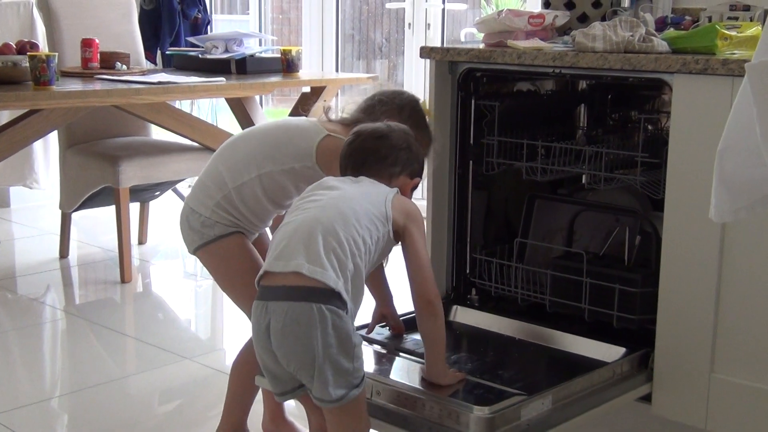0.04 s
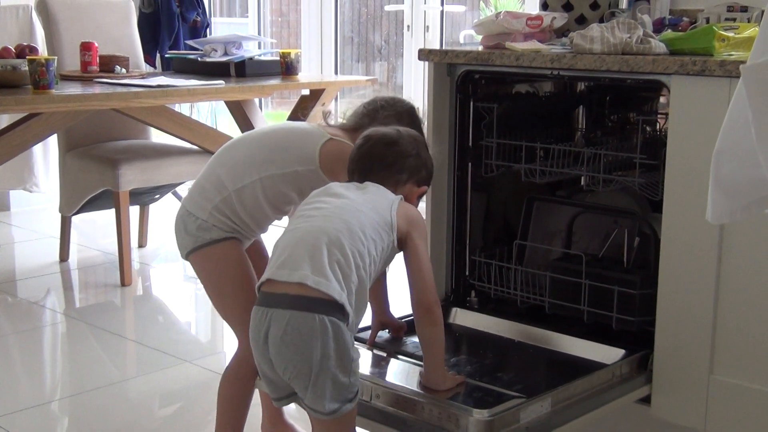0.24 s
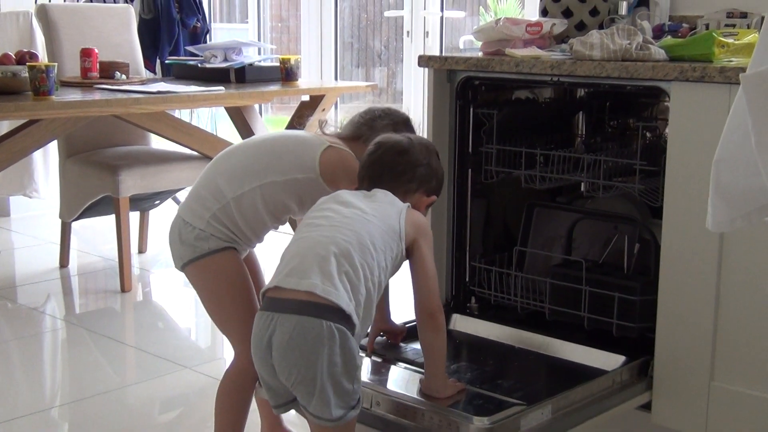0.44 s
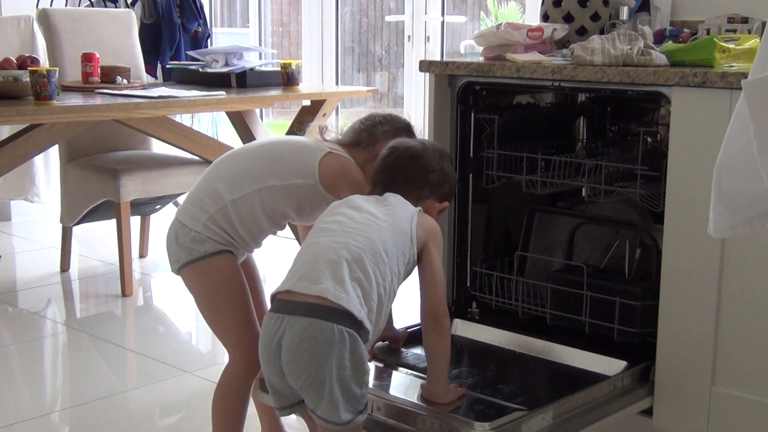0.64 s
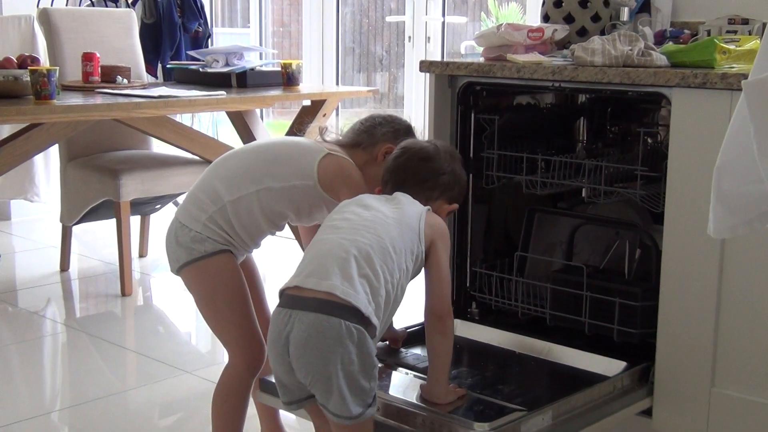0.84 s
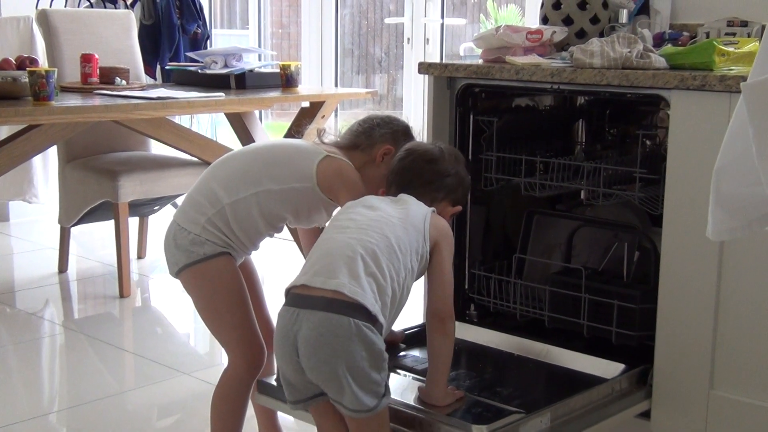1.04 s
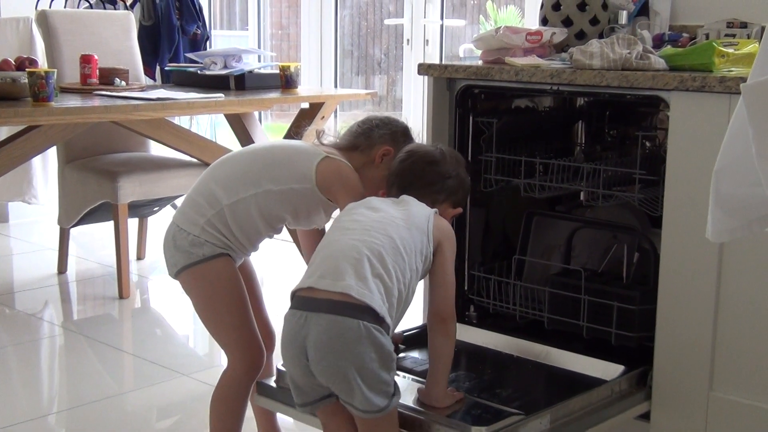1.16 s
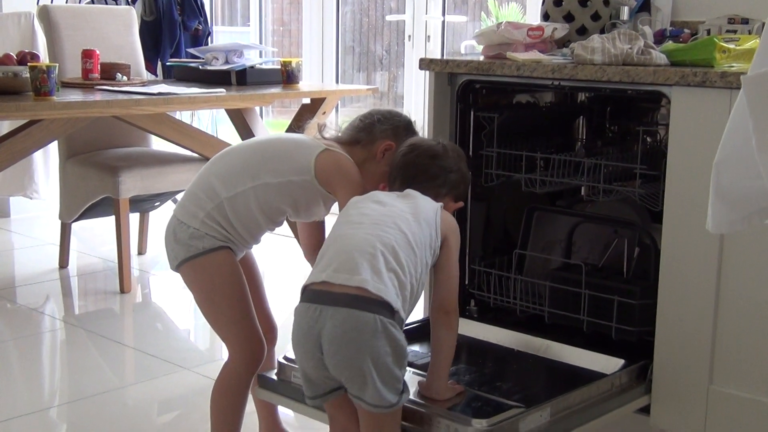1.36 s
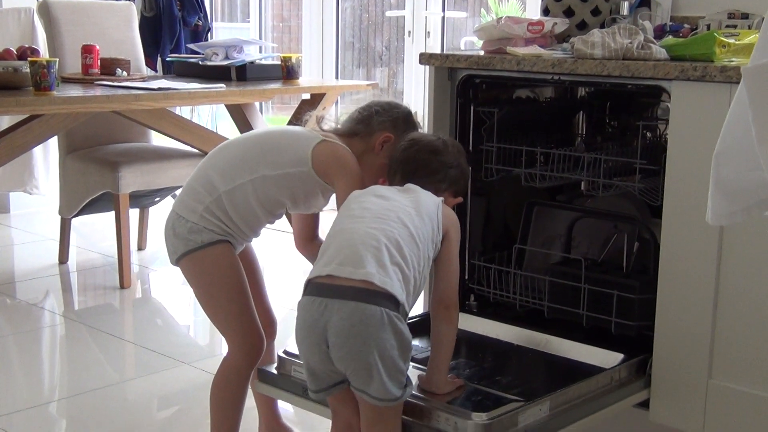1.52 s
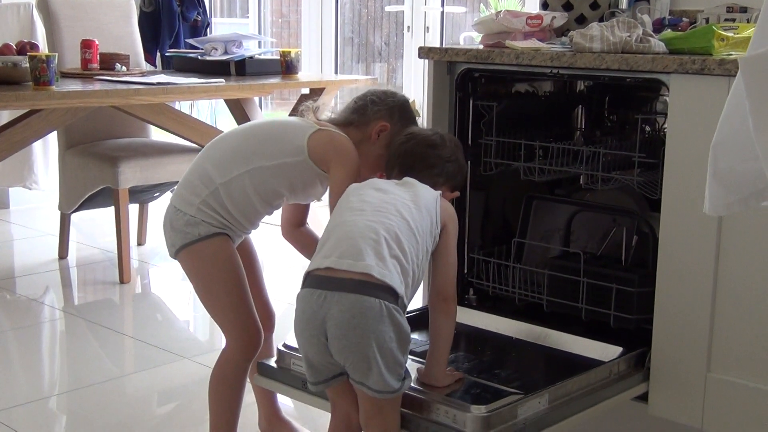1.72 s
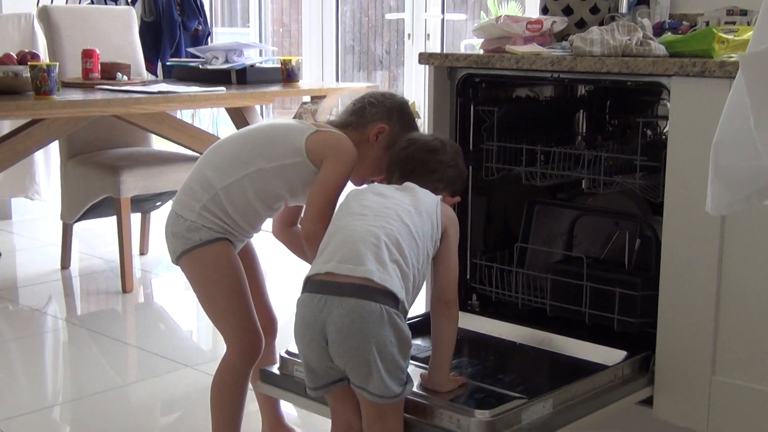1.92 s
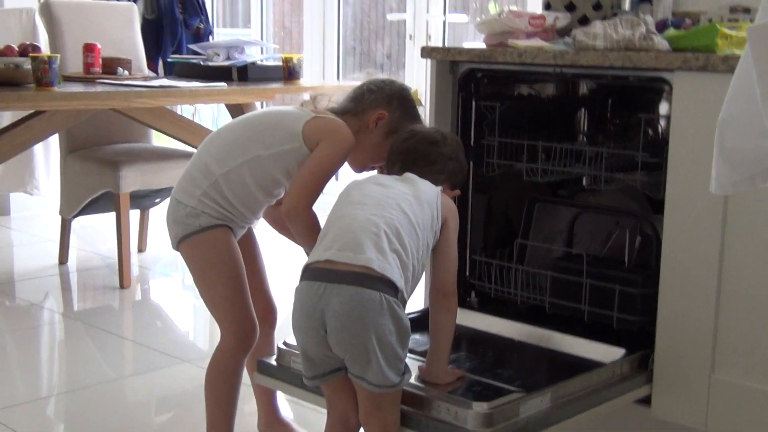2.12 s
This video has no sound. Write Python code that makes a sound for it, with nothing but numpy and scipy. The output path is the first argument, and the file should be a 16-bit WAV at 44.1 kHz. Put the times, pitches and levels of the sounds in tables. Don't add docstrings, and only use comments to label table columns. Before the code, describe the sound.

Hands knock an open dishwasher door in a tiled kitchen: soft pats, a small latch click, thumps with wire rattle, a bright snap, then a loud ringing clack, heard from a few metres away over faint hum.

```python
import sys
import numpy as np
from scipy import signal
from scipy.fft import rfft, irfft, next_fast_len
from scipy.io import wavfile
from scipy.ndimage import uniform_filter1d

SR = 44100
rng = np.random.default_rng(int(sys.argv[2]) if len(sys.argv) > 2 else 0)


def ratio(d):
    e = np.asarray(d, float) / 20
    return 10 ** e


def persist_wave(psi):
    counts = np.round(np.clip(psi, -1, 1) * 32767).astype(np.int16)
    wavfile.write(sys.argv[1], SR, np.atleast_2d(counts).T)


N = 96314
BURST_N = 16384
BANDS_HZ = 30 * 2 ** np.arange(0, 9.4, .5)


def unit(x):
    return x / np.sqrt(np.sum(x ** 2))


def stereo(mid, side):
    return np.array([mid + side, mid - side])


def read(table, hz):
    a = np.array(table, float)
    return np.interp(np.log(np.maximum(hz, 1)), np.log(a[:, 0]), a[:, 1])


def colour(x, table, edge_db=-40):
    hz = np.arange(2049) * SR / 4096
    db = read([(table[0][0] / 2, table[0][1] + edge_db)] + list(table), hz)
    cepstrum = irfft(db * np.log(10) / 20)
    cepstrum[1:2048] *= 2
    cepstrum[2049:] = 0
    impulse = irfft(np.exp(rfft(cepstrum)))
    return signal.fftconvolve(np.atleast_2d(x), impulse[None], axes=1)[:, :np.shape(x)[-1]]


def carve(x, holes):
    hz = np.fft.rfftfreq(x.shape[-1], 1 / SR)
    gain_db = np.zeros_like(hz)
    for f_hz, width_hz, db in holes:
        gain_db += db * np.exp(-((hz - f_hz) / width_hz) ** 2)
    return irfft(rfft(x) * ratio(gain_db), x.shape[-1])


def band(x, hz):
    f = np.maximum(np.fft.rfftfreq(x.shape[-1], 1 / SR), 1)
    octaves = np.log2(f / hz)
    return irfft(rfft(x) * np.cos(np.pi / 2 * np.clip(2 * octaves, -1, 1)) ** 2, x.shape[-1])


def walk(rate_hz):
    k = int(SR / rate_hz)
    steps = np.repeat(rng.standard_normal(N // k + 1), k)
    w = uniform_filter1d(uniform_filter1d(steps, k), k)[:N]
    return w / np.std(w)


def ring(modes, t):
    return sum(ratio(db) * np.sin(2 * np.pi * hz * t) * ratio(-60 * t / t60) for hz, db, t60 in modes)


def struck(modes, s, db, t, rise_s):
    after = np.maximum(t - s, 0)
    modes_sum = sum((-1) ** k * ring([m], after) for k, m in enumerate(modes))
    return ratio(db) * modes_sum * (1 - np.exp(-after / max(rise_s, 1e-4)))


# f/Hz, t60/s
ROOM_T60_S = [(100, 0.73), (250, 0.5), (700, 0.52), (2500, 0.49), (6000, 0.43), (10000, 0.28),
              (16000, 0.26)]
# f/Hz, level/dB
ROOM_SIDE_DB = [(60, -17), (110, -52), (200, -28), (380, -16), (700, -25.5), (1290, -22), (2380, -20.5),
                (4400, -17), (8120, -6.5), (15000, -51)]
BUILD_S, BASS_LATE_CYCLES = 0.00057, 0.84


def room(tail):
    t = np.arange(BURST_N) / SR
    noise, out = rng.standard_normal((2, BURST_N)), 0
    for hz in BANDS_HZ:
        decay = ratio(-60 * t / read(ROOM_T60_S, hz) / tail)
        env = decay * (1 - np.exp(-t / (BUILD_S + BASS_LATE_CYCLES / hz)))
        mid, side = (unit(v) * np.sqrt(hz) for v in band(noise, hz) * env)
        out = out + stereo(mid, side * ratio(read(ROOM_SIDE_DB, hz)))
    return unit(out)


CLICK_SCATTER_DB = 5.5


def knocks(events, tone, modes=None, modes_db=-6, wet=True, strike_db=-3, holes=(), tail=1):
    lead = SR // 4
    x, blows = np.zeros((2, 2, N + lead + BURST_N))
    t = np.arange(BURST_N) / SR
    for s, db, rise_s, length_s, rattle_db in events:
        clicks = rng.standard_normal(BURST_N) * ratio(CLICK_SCATTER_DB * rng.standard_normal(BURST_N))
        swell = 1 - np.exp(-t / max(rise_s, 1e-4))
        rattle = unit(clicks * swell * np.exp(-t / max(length_s, 1e-4)))
        echo = room(tail) if wet else 0
        i = int(s * SR) + lead
        x[:, i:i + BURST_N] += ratio(db) * 30 * (ratio(rattle_db) * rattle / 2 + echo)
        blows[:, i + int(2 * rise_s * SR)] = ratio(db + strike_db) * 20
    body = unit(colour(x, tone))
    if modes:
        rung = signal.fftconvolve(x + blows, ring(modes, t)[None], axes=1)[:, :x.shape[1]]
        body = body + ratio(modes_db) * unit(rung)
    return np.sqrt(np.sum(x ** 2)) * carve(body, holes)[:, lead:lead + N]


# f/Hz, level/dB
HOUSE_TONE = [(15, -45), (25, -17.5), (124, -12), (245, -6.5), (312, -8), (438, -6.5), (668, -10),
              (2560, -22.5), (3000, -37), (3900, -59), (6600, -120)]
HOUSE_SIDE_DB = [(60, -4), (110, -18), (200, -15), (380, -22), (700, -19.5), (1290, -19.5), (2380, -16),
                 (4400, -18), (8120, -6), (15000, -23)]
HOUSE_DB, HOUSE_FADE_DB_PER_S, FLICKER_DB = -62, -0.5, .8
# f/Hz, level/dB
HISS_TONE = [(1760, -36), (3000, -1), (6490, -1), (9400, -12), (14800, 5), (15200, -9.5), (16000, -2),
             (18400, -22), (19000, -33)]
# f/Hz, width/Hz, depth/dB
HISS_HOLES = [(9500, 590, -4.5)]
HISS_DB, HISS_FADE_DB_PER_S = -23.5, -6.5


def house(t):
    noise, out = rng.standard_normal((2, next_fast_len(N))), 0
    fade_s = np.minimum(t, 1.1)
    for hz in BANDS_HZ:
        if hz < 3000:
            db = read(HOUSE_TONE, hz) + HOUSE_FADE_DB_PER_S * fade_s
        else:
            db = HISS_DB + read(HISS_TONE, hz) + HISS_FADE_DB_PER_S * fade_s
        mid, side = band(noise, hz)[:, :N] * ratio(db + FLICKER_DB * walk(8.34))
        out = out + stereo(mid, side * ratio(read(HOUSE_SIDE_DB, hz)))
    return carve(out, HISS_HOLES) * ratio(HOUSE_DB) / np.std(out)


# f/Hz, level/dB rms
MOTOR_TONES = [(99, -78), (247, -80), (452, -78), (2519, -84.5)]


def motor(t):
    return sum(np.sqrt(2) * ratio(db + 2 * walk(6.43)) * np.sin(2 * np.pi * hz * t) for hz, db in MOTOR_TONES)


WHISTLE_HZ, WHISTLE_DB = 15625, -78
FIELD_HZ, GAP_S, GAP_SHARE = 50, .090, .2


def screen_whistle(t):
    gate = np.abs(((t - GAP_S) * FIELD_HZ + .5) % 1 - .5) > GAP_SHARE / 2
    tone = np.sqrt(2) * ratio(WHISTLE_DB) * np.sin(2 * np.pi * WHISTLE_HZ * t)
    return uniform_filter1d(gate * 1., size=44) * tone


# f/Hz, level/dB, t60/s
CAMERA_MODES = [(2120, -2, 0.0035), (1480, -10, 0.011), (3000, -7.5, 0.0042), (4170, -11, .003),
                (6750, -15, 0.0073), (8800, -9.5, 0.0033), (11900, 6.5, 0.0012), (15800, -6, 0.0025),
                (16800, -14, .004)]
CAMERA_S, CAMERA_DB, CAMERA_RISE_S = 1.8292, -29, 0.000081


def camera_tick(t):
    after = np.maximum(t - CAMERA_S, 0)
    return ratio(CAMERA_DB) * ring(CAMERA_MODES, after) * (1 - np.exp(-after / CAMERA_RISE_S))


# t/s, level/dB
PATS = [
    (.051, -49),
    (0.077, -56),
]
# f/Hz, level/dB, t60/s
PAT_MODES = [(237, 0.5, 0.077), (179, -20, .05)]


def pats(t):
    return sum(ratio(db) * ring(PAT_MODES, np.maximum(t - s, 0)) for s, db in PATS)


# t/s, level/dB, rise/s, rattle length/s, rattle over room/dB
TICKS = [(.053, -61, 0.0014, 0.0039, 0), (.058, -59, 0.0011, 0.0043, 0.055),
         (.159, -66, 0.00085, .001, 0.0083), (.172, -65.5, 0.00043, 0.0023, 0.013),
         (.89, -75, 0.0018, 0.0026, 0), (1.35, -68.5, 0.0023, 0.012, 0), (2.07, -54, .001, 0.0023, 0)]
# f/Hz, level/dB
TICK_TONE = [(3000, -22), (6000, 8), (8000, 12), (13000, 7), (16000, 0), (18500, -12)]


def ticks():
    return knocks(TICKS, TICK_TONE, wet=False)


# t/s, level/dB, rise/s, rattle length/s, rattle over room/dB
SLIDE = [
    (1.834, -62.5, .03, 0.11, 0),
    (1.928, -60.5, .002, 0.0076, 0),
]
# f/Hz, level/dB
SLIDE_TONE = [(3000, -6), (6000, -7), (8500, 0), (12000, -2), (14000, -8), (17000, -22)]


def slide():
    return knocks(SLIDE, SLIDE_TONE, wet=False)


# t/s, level/dB, rise/s, rattle length/s, rattle over room/dB
SCRAPE = [
    (1.939, -51, 0.0024, 0.018, 0.017),
]
# f/Hz, level/dB
SCRAPE_TONE = [(500, 20), (1200, 15), (4500, 16), (5500, -2), (8000, -4), (17000, -25)]


def scrape():
    return knocks(SCRAPE, SCRAPE_TONE, wet=False)


# t/s, level/dB, rise/s, rattle length/s, rattle over room/dB
EARLIER = [
    (-0.013, -50, 0.0011, 0.004, -3),
]
# f/Hz, level/dB
EARLIER_TONE = [(180, -39), (300, -34), (610, 1), (930, -11), (1160, -1.5), (3300, -6.5), (4480, -5),
                (17000, -22)]
# f/Hz, width/Hz, gain/dB
EARLIER_BUMPS = [(4440, 130, 8.7), (2570, 100, 5.4)]


def earlier_knock():
    return knocks(EARLIER, EARLIER_TONE, holes=EARLIER_BUMPS)


# t/s, level/dB, rise/s, rattle length/s, rattle over room/dB
CATCH = [
    (.210, -50.5, 0.00041, 0.0033, 3.8),
]
# f/Hz, level/dB
CATCH_TONE = [(1900, -19), (2400, -2), (3000, 3.5), (3350, 7.5), (3800, 6), (4400, -17.5), (8000, -12.5),
              (11000, -25)]
# f/Hz, width/Hz, depth/dB
CATCH_HOLES = [(3300, 87, -7)]


def latch_catch():
    return knocks(CATCH, CATCH_TONE, tail=.8, holes=CATCH_HOLES)


# t/s, level/dB, rise/s, rattle length/s, rattle over room/dB
RACK = [
    (1.116, -59.5, 0.0035, 0.0075, 4.5),
    (1.149, -39.5, 0.0092, 0.0079, 3.3),
]
# f/Hz, level/dB
RACK_TONE = [(800, 8.5), (2000, 3), (4500, -2), (6600, -0.5), (10500, 2.5), (13000, -2), (14500, -5),
             (18500, -14)]
# f/Hz, level/dB, t60/s
RACK_MODES = [(6650, -3, .015), (8600, -2, .02), (10600, 0, .012), (14300, -5, .02)]


def rack():
    return knocks(RACK, RACK_TONE, RACK_MODES, modes_db=-22)


# t/s, level/dB, rise/s, rattle length/s, rattle over room/dB
NUDGE = [
    (1.720, -47, 0.000614, 0.007, 2),
    (1.729, -49, 0.0032, 0.0098, -5),
]
# f/Hz, level/dB
NUDGE_TONE = [(100, -14.5), (250, 3.5), (600, -12), (1290, -7.5), (1740, -5), (2100, -13), (8370, -21.5),
              (12500, -28), (15000, -44)]
# f/Hz, level/dB, t60/s
NUDGE_MODES = [(265, -2, .07), (370, -2, .08), (580, -1, .07), (1050, -4, .05), (1780, 0, .07),
               (3400, 6, .012)]


def nudge():
    return knocks(NUDGE, NUDGE_TONE, NUDGE_MODES, modes_db=-6, strike_db=4)


# t/s, level/dB, rise/s, rattle length/s, rattle over room/dB
THUMPS = [
    (1.117, -40.5, 0.007, 0.0068, -1.3),
    (1.138, -40, 0.003, 0.0029, -1.4),
    (1.536, -72, 0.0019, 0.0059, 0),
]
# f/Hz, level/dB
THUMP_TONE = [(80, -21.5), (209, 2.5), (950, -5), (1100, -6), (2400, -16.5), (3500, -25.5), (8000, -51)]
# f/Hz, level/dB, t60/s
DOOR_MODES = [(252, -1, .09), (395, -3, .09), (580, 0, .09), (750, -6, .07), (1100, -5, .05),
              (1390, -6, .05)]
DOOR_RING = [(182, 2, .15), (251, 3, 0.23), (574, 2, .15), (762, 1, .2), (1100, -17, 0.11), (1376, -6, .12)]


def door_thumps(t):
    hits = knocks(THUMPS, THUMP_TONE, DOOR_MODES, modes_db=-1.5, strike_db=8)
    return hits + struck(DOOR_RING, THUMPS[0][0], -48, t, rise_s=0.0063)


# t/s, level/dB, rise/s, rattle length/s, rattle over room/dB
LID = [
    (1.429, -39, 0.0012, 0.013, 0),
    (1.432, -33.5, 0.00094, 0.0062, 0.022),
]
# f/Hz, level/dB
LID_TONE = [(160, -14.5), (700, -1), (980, -12.5), (3700, -12), (4600, -18.5), (5500, -16.5), (9400, -11.5),
            (19000, -30)]
# f/Hz, level/dB, t60/s
LID_MODES = [(1556, -6, 0.035), (4070, -10, .02), (5230, -7, 0.013), (5750, -3, 0.016), (7600, -4, .012),
             (8980, -4, .015), (10300, 1, 0.013)]
LID_RING = [(387.5, -7, 0.57), (581, -11, 0.2), (599, 8, 0.11), (642, -1, 0.46), (731, 1, 0.34),
            (750, 4, 0.092), (765, 2, 0.35), (795, -2, 0.42), (1520, -6, 0.19)]
# f/Hz, width/Hz, depth/dB
LID_HOLES = [(463, 89, -7), (680, 115, -2.5), (4670, 250, -6), (6330, 150, -4), (8200, 450, -8),
             (10100, 200, -9), (11200, 180, -1)]


def lid(t):
    hits = knocks(LID, LID_TONE, LID_MODES, modes_db=-10.5, strike_db=2, holes=LID_HOLES)
    return hits + struck(LID_RING, LID[1][0], -49, t, rise_s=.008)


# t/s, level/dB, rise/s, rattle length/s, rattle over room/dB
CLACK = [
    (1.952, -17.5, 0.000618, 0.0057, -3),
]
# f/Hz, level/dB
CLACK_TONE = [(100, -28), (150, -10), (190, -2.5), (600, -6.5), (1500, -12.5), (2100, -4.5), (2800, -15),
              (10000, -14), (17200, -34.5), (19000, -72)]
# f/Hz, level/dB, t60/s
CLACK_MODES = [(197.4, 11.5, 0.067), (634, -8, 0.16), (960, -11, 0.05), (1253, 5.5, 0.065),
               (2090, 14, 0.02), (2306, 10.5, 0.025), (3430, 22.5, 0.0075), (4800, 12, 0.012),
               (6010, 16.5, 0.018), (7620, -10, .015), (9300, 14, 0.017)]
PANEL_RING = [(197, 13.5, 0.049), (229, -3.5, 0.26), (269.5, -2.5, 0.63), (292, -11, 0.64),
              (383.9, 8.5, 0.25), (460.4, -1, 0.23), (565, -7, 0.59), (616.6, -1.5, 0.22), (708, -3, 0.23),
              (842, -5, 0.38), (985, -6.5, 0.27), (1166, 1.5, .15), (1290, 3.5, .12), (523, -4, 0.17)]
WIRE_RING = [(1434, -7.5, 0.46), (1542, -3, 0.42), (1606, -2, 0.43), (1890, -9.5, 0.67), (1984, -3.5, 0.61),
             (2055, -1.5, 0.5), (2120, -3.5, 0.38), (2129, -1, 0.54), (2180, -5, 0.42), (2260, 1.5, 0.34),
             (2310, 2, .25), (2385, -9, .33), (2585, -21, 0.31)]
# f/Hz, width/Hz, depth/dB
CLACK_HOLES = [(340, 17, -3), (1787, 51, -14)]


def clack(t):
    blow = knocks(CLACK, CLACK_TONE, CLACK_MODES, modes_db=-10, strike_db=-3.0, holes=CLACK_HOLES)
    panel = struck(PANEL_RING, CLACK[0][0], -31.5, t, rise_s=0.0073)
    wires = struck(WIRE_RING, CLACK[0][0], -34, t, rise_s=0.009)
    return blow + panel + wires


def scene():
    t = np.arange(N) / SR
    background = house(t) + motor(t) + screen_whistle(t)
    hits = ticks() + slide() + scrape() + earlier_knock() + latch_catch() + rack() + nudge()
    hits = hits + door_thumps(t) + lid(t) + clack(t)
    low_cut = signal.butter(4, 106, "high", fs=SR, output="sos")
    return background + camera_tick(t) + pats(t) + signal.sosfilt(low_cut, hits)


def band_limit(x):
    return signal.sosfilt(signal.butter(12, 19110, fs=SR, output="sos"), x)


# f/Hz, level/dB
LEFT_DB = [(30, 5), (80, 4.5), (150, 3), (300, 0), (1200, 1), (12000, 0.6)]
TOP_HZ, CEILING = 19110, .45
DUCK_S, DUCK_LEN_S, DUCK_DB = .205, .003, -12


def record(dry):
    t = np.arange(N) / SR
    hz = np.fft.rfftfreq(N, 1 / SR)
    tilt_db = read(LEFT_DB, hz) / 2
    mics = irfft(rfft(dry) * ratio(np.array([tilt_db, -tilt_db])) * (hz < TOP_HZ), N)
    limited = CEILING * np.tanh(mics / CEILING)
    duck = ratio(DUCK_DB * np.exp(-((t - DUCK_S) / DUCK_LEN_S) ** 2))
    return band_limit(limited * duck)


dry = scene()
out = record(dry)
persist_wave(out)
```